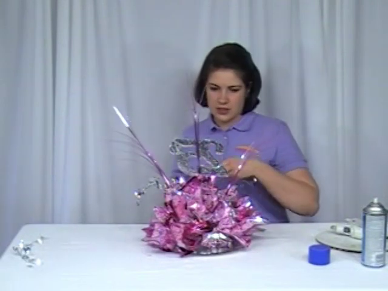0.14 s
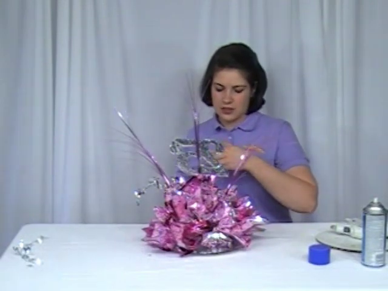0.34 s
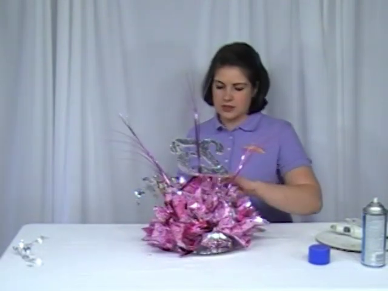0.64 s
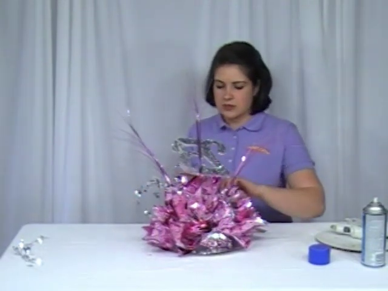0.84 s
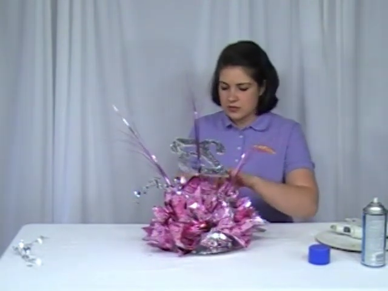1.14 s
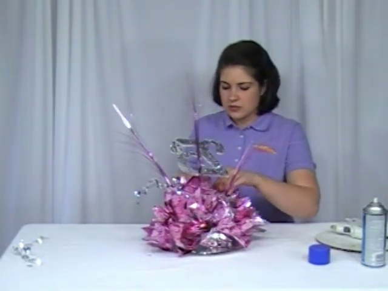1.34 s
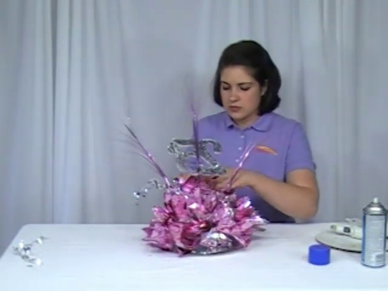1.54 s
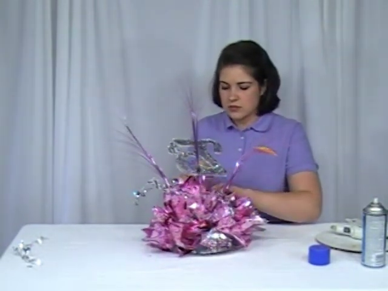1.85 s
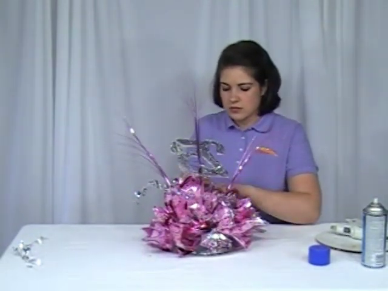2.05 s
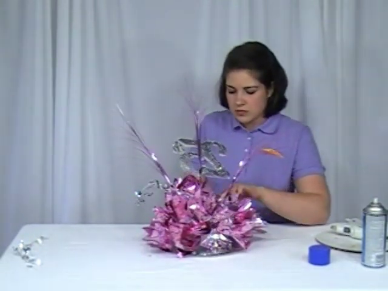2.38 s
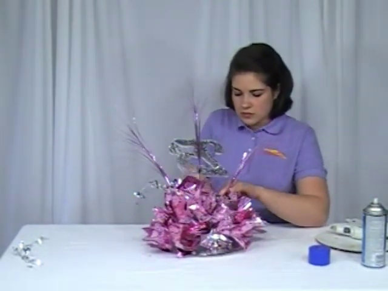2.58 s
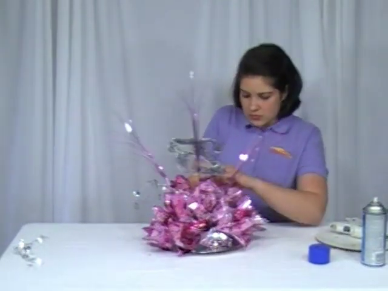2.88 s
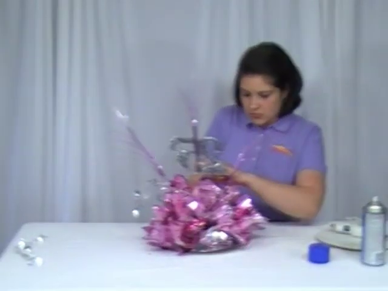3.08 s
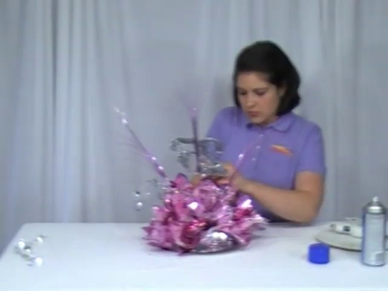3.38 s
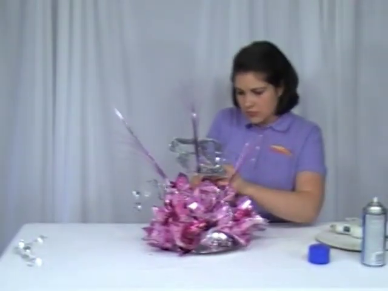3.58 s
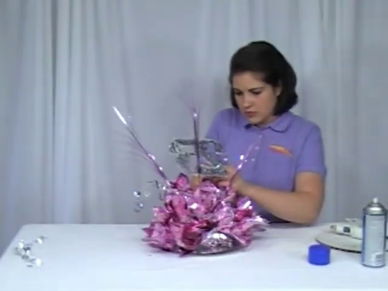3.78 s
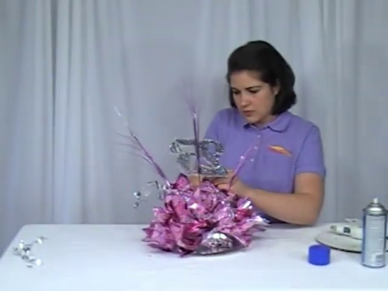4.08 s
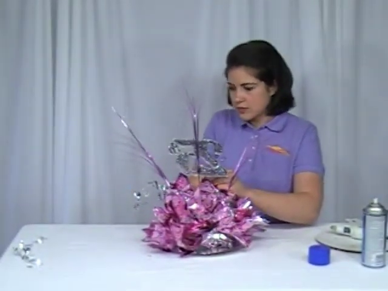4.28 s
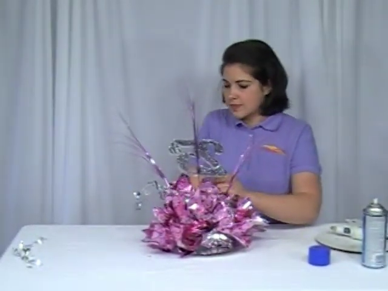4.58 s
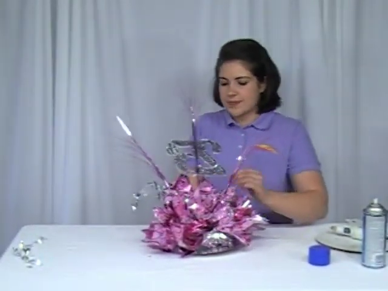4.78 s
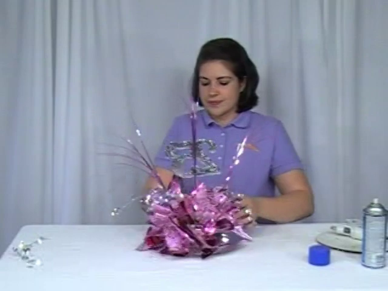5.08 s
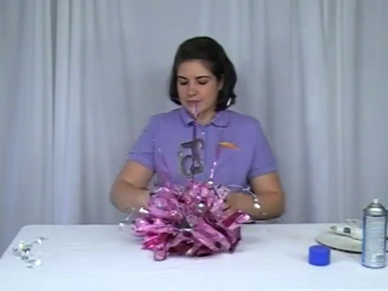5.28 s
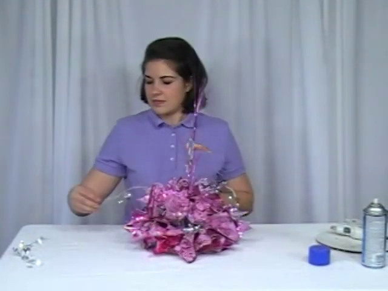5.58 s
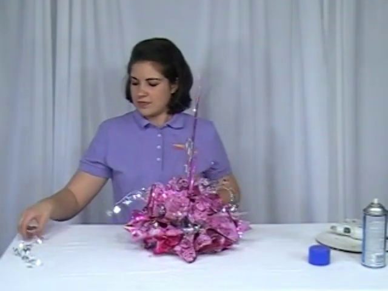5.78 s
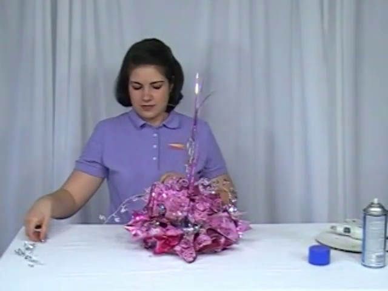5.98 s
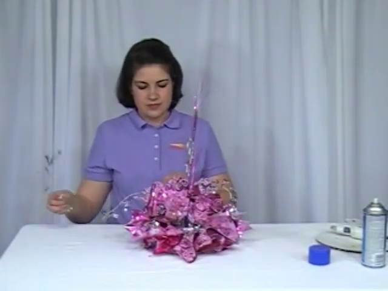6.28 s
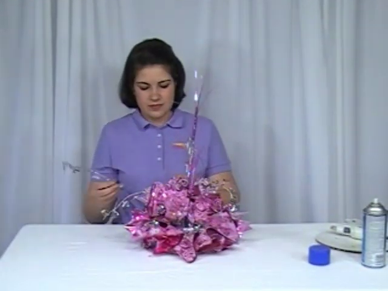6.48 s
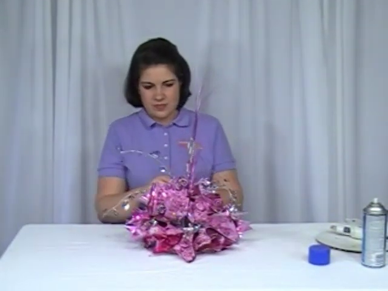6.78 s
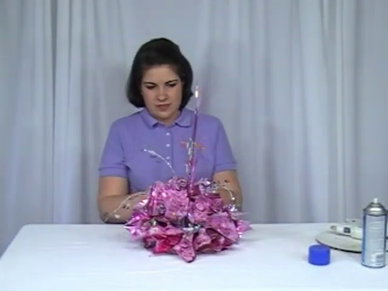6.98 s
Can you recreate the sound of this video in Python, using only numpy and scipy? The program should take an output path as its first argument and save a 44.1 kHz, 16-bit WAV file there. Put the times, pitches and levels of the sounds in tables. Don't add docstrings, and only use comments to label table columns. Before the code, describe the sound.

Crisp foil rustling indoors, picked up from a short distance with a light room tail. Dense tiny clicks swell and stop as fingers grip, joined by loud creases, needle-sharp ticks and small bead or wire taps. A hard snap breaks out before four seconds and a dense crackling cluster around five; a quiet pause and soft table bumps precede the last crinkles. Soft ventilation and electrical buzz never stop.

```python
import sys
import numpy as np
from scipy import signal
from scipy.fft import rfft, irfft, next_fast_len
from scipy.io import wavfile
from scipy.ndimage import map_coordinates

SR = 44100
rng = np.random.default_rng(int(sys.argv[2]) if len(sys.argv) > 2 else 0)


def unload_wav(signal):
    wavfile.write(
        sys.argv[1],
        SR,
        np.round(np.clip(np.atleast_2d(signal).T, -1, 1) * 32767).astype(np.int16),
    )


def gain_from_decibels(decibels):
    exponent = np.asarray(decibels, float) / 20
    return 10 ** exponent


N = 314874

# start_s, crinkle_db, crumple_above_crinkle_db
FIDGETS = [(0, -60.5, -2.5), (.52, -62.5, -1.5), (.8, -45, -5), (1.37, -47, -7.5), (1.69, -49.5, -3.5),
           (1.8, -45, -5), (2.54, -43.5, -4), (2.65, -36.5, -4.5), (2.8, -45, -6), (2.92, -57.5, -3),
           (3.6, -56, 0), (4.3, -63.5, 5), (4.87, -48.5, -1.5), (5.75, -56.5, 3.5), (6.38, -65, -2.5),
           (6.6, -47, -2), (6.92, -37, -6), (7.14, -49, -0.5)]
# start_s, hold_s, crinkle_db, crumple_above_crinkle_db
FINGER_GRIPS = [(0.576, .005, -43.5, -8), (0.691, 0.0094, -38.5, -7), (0.938, 0.02, -41.5, -6),
                (1.09, 0.052, -40, -4), (1.207, 0.085, -45.5, -6.5), (1.45, .06, -44.5, -4.5),
                (1.57, .04, -57, -8), (1.702, 0.031, -39, -9.5), (1.884, 0.028, -36, -5),
                (2.056, 0.021, -35.5, -8.5), (2.217, 0.035, -36.5, -5.5), (2.355, 0.047, -39, -15),
                (2.956, 0.045, -53, 4), (3.064, .02, -43, -3.5), (3.222, 0.12, -47.5, -4.5),
                (3.354, 0.16, -40.5, -5.5), (3.87, 0.021, -40, -2), (4.134, 0.08, -43, -10),
                (4.375, .01, -40.5, -6.5), (4.46, .065, -40, -4), (4.603, .03, -43, -9.5),
                (4.927, .04, -32, -16), (5.032, 0.41, -37, -6.5), (5.494, 0.022, -42.5, -6),
                (5.592, .07, -43, -14), (5.71, .005, -53, 3), (6.445, 0.066, -46, -7.5),
                (6.657, .01, -39.5, -13), (7.135, .01, -42, -1)]
# frequency_hz, level_db
CRINKLE_COLOUR = [(1880, -18.5), (3200, -20.5), (3990, -11.5), (5400, -3), (6620, -1), (7490, 0),
                  (9020, -6), (12300, -17.5), (16000, -62), (22000, -120)]
# frequency_hz, level_db
CRUMPLE_COLOUR = [(180, -50), (300, -30), (369, -10), (521, -14.5), (634, -7), (1740, -1), (1870, 0.5),
                  (4000, -7), (5200, -9), (8800, -120)]
# frequency_hz, decay_60db_s
ROOM_DECAY = [(200, 0.95), (2000, 0.76), (7000, 0.69), (12000, 0.38)]
# frequency_hz, level_db
AIR_MID_COLOUR = [(15, -50), (25, -14.5), (150, -12.5), (220, -8), (445, -4.5), (900, -6), (1150, -8.5),
                  (1400, -10.5), (3280, -18.5), (4500, -15.5), (8000, -22.5), (9500, -25.5), (12400, -22),
                  (16000, -60)]
# frequency_hz, level_db
AIR_SIDE_COLOUR = [(15, -60), (25, -35), (125, -13.5), (189, -10.5), (286, -7.5), (547, -6), (656, -7.5),
                   (1260, -12), (1800, -16), (6950, -30), (12300, -33), (16000, -68), (22000, -120)]
# pitch_hz, level_db
LAMP_TONES = [(241, -70), (720, -70.5), (839.8, -75.5), (961, -76), (1081, -65.5), (2638, -74),
              (3537, -69.5), (3661, -71), (3779, -68), (4980, -70), (5760, -67), (5997, -72), (8096, -76),
              (10557, -73)]
# start_s, peak_db
THIN_CREASES = [(0.146, -43), (0.2, -39.5), (0.5465, -37), (.627, -35), (.678, -29.5), (0.958, -26),
                (1.056, -28.5), (1.4744, -29.5), (1.5562, -26), (1.6295, -29), (1.8028, -27), (2.0504, -28),
                (2.2585, -23), (2.469, -26), (2.9477, -32), (3.0447, -34), (3.2032, -33.5), (3.259, -35.5),
                (3.7594, -34.5), (4.0331, -34), (4.2372, -34), (4.415, -27.5), (4.918, -30), (5.1627, -26),
                (5.3432, -20.5), (6.2207, -36), (6.419, -40), (6.47, -28), (6.9656, -27.5), (7.0653, -27)]
# start_s, peak_db
WIDE_CREASES = [(0.8825, -30.5), (1.3758, -34.5), (1.692, -30), (1.8443, -29), (2.2004, -33), (2.385, -30),
                (2.5541, -28.5), (3.0844, -30.5), (3.3543, -27.5), (3.6593, -34), (3.7196, -36),
                (4.1034, -37), (4.147, -33), (4.181, -37), (4.6057, -26), (4.7571, -48), (5.2882, -24.5),
                (5.868, -39), (6.33, -39), (6.7421, -27)]
# start_s, peak_db, fold_above_peak_db, stem_above_peak_db
BIG_CREASES = [(0.5765, -29, -11.5, -7), (0.7056, -25.5, -28, -1.5), (0.9418, -30, -5, -8),
               (1.0974, -29.5, -7.5, -9), (1.4945, -23, -27, -16), (2.0911, -28.5, -16, 0),
               (2.5986, -26.5, -23, -18), (2.6743, -25, -18, -12), (2.7368, -30.5, -7, 0.5),
               (2.938, -30.5, -30, 0.5), (3.3271, -22.5, -21, -26), (3.8336, -16, -12.5, -7.5),
               (3.876, -23.5, -17, -20), (4.369, -23.5, -14, -2), (4.5058, -17, -13.5, -13.5),
               (4.9416, -23, -9, -9), (4.9594, -20, -8.5, -31), (4.9887, -23, -16, -28),
               (5.0333, -23.5, -12, -3.5), (5.1002, -23.5, -29, -21), (5.4081, -22, -8, -9),
               (5.4287, -20.5, -11.5, -21), (5.5018, -26.5, -9, -5), (5.6192, -29, -14, -5),
               (5.7147, -28, -21, -5.5), (6.0106, -31, -13, -33), (6.5127, -20, -31, -9),
               (6.5231, -22.5, -16, -15), (6.6487, -24, -7.5, -13), (6.784, -26, -9.5, -6)]
# frequency_hz, level_db
STEM_COLOUR = [(1200, -30), (2200, -7.5), (3000, -7), (4500, -15), (6000, -10), (12000, -25)]
# start_s, peak_db, pitch_hz
STIFF_FACETS = [(0.5824, -29, 7730), (0.7104, -30, 7350), (0.7184, -27, 6630), (2.2385, -23, 6870),
                (2.2624, -32, 6770), (2.272, -33, 7290), (2.9477, -32, 7500), (3.2034, -29.5, 8200),
                (3.2194, -42, 6800), (3.327, -35, 7590), (3.834, -18, 8600), (3.844, -20, 7060),
                (4.369, -27, 5400), (4.5063, -18, 8300), (4.8928, -34, 8140), (4.9604, -25, 6740),
                (4.9747, -15, 8100), (4.9897, -16, 7900), (5.001, -18, 8010), (5.009, -26, 7460),
                (5.061, -22, 7550), (5.0992, -19, 6670), (5.664, -28, 6000), (5.7252, -31, 7800),
                (6.0102, -35, 7960), (6.3764, -43, 8500), (6.5157, -27, 6150)]
# start_s, peak_db, pitch_hz, decay_60db_s
DISH_TAPS = [(.584, -39, 3060, .06), (.697, -31, 4780, 0.049), (1.555, -37, 4940, 0.045),
             (2.64, -35, 4500, 0.046), (3.128, -41.5, 1103, 0.06), (3.836, -32, 2620, 0.062),
             (4.369, -37, 2520, 0.049), (6.012, -40.5, 1580, 0.056), (6.02, -50.5, 1810, .2),
             (6.513, -31, 4270, 0.049), (6.521, -48, 4200, .3), (6.65, -37, 1560, 0.065),
             (6.652, -41, 3730, .08)]
# start_s, peak_db, decay_scale_s
TABLE_PUSHES = [
    (3.833, -43.5, 1.6),
    (4.377, -48.5, 1.16),
    (4.503, -48, 0.95),
    (5.827, -39, 1.15),
    (5.96, -48, 0.89),
]
# pitch_hz, pair_spacing_hz, level_db, share_of_decay
TABLE_MODES = [(187, 19, -6.5, 0.37), (252.6, 20.6, -0.5, 0.31), (370, 30, -6.5, 0.48),
               (469, 38, -13, 0.65)]
# frequency_hz, level_db
RUMBLE_COLOUR = [(50, -37), (110, -7), (300, 0), (550, -2), (1200, -30)]
# frequency_hz, level_db
SIDE_RESPONSE = [(200, -3), (600, -12), (1300, -23), (2700, -17.5), (5500, -17.5), (7300, -16), (8400, -4),
                 (9500, -9.5), (12500, -7.5)]
# frequency_hz, level_db
FOIL_RESPONSE = [(20, -40), (130, -9), (260, 0), (400, -0.5)]
# frequency_hz, level_db
KNOCK_BASS = [(20, -36), (70, -9), (150, 0)]

MAINS_HZ = 59.97
RISE_DB_PER_S, FALL_DB_PER_S = 411, 161
THIN_FOLD_DB, THIN_STEM_DB = -18, -11
WIDE_FOLD_DB, WIDE_STEM_DB = -7.5, -23
RING_HZ, RING_SCATTER_HZ = 6900, 850


def unit(x):
    return x / np.sqrt(np.mean(x ** 2) + 1e-20)


def along(points, hz):
    f, v = np.transpose(points)
    return np.interp(np.log(hz + 1), np.log(f + 1), v)


def filtered(x, response):
    m = next_fast_len(N + SR // 2)
    spectrum = rfft(x, m) * response(np.fft.rfftfreq(m, 1 / SR))
    return irfft(spectrum, m)[..., :N]


def coloured(x, colour):
    return filtered(x, lambda hz: gain_from_decibels(along(colour, hz)))


def wobble(rate):
    knots = rng.standard_normal(int(N / SR * 200) + 4)
    return map_coordinates(knots, [np.arange(N) * rate / SR])


def dying_away(s, gain, t60, wave):
    size = wave.shape[1]
    t = np.arange(size)
    rows = gain[:, None] * gain_from_decibels(-60 * t / SR / t60[:, None]) * wave
    at = np.round(s * SR).astype(int)[:, None] + t
    return np.bincount(at.ravel(), rows.ravel(), N + size)[:N]


def bursts(s, gain, t60, size):
    return dying_away(s, gain, t60, rng.standard_normal((len(s), size)))


def pings(s, gain, hz, t60, size):
    wave = np.sin(2 * np.pi * hz[:, None] * np.arange(size) / SR)
    return dying_away(s, gain, t60, wave)


def buckling(low_hz, high_hz, spread_db, clump_db, t60, hiss_db, count):
    draw = rng.random((count, 4))
    s = draw[:, 0] * (N - 1) / SR
    strength = gain_from_decibels(np.minimum(-spread_db * np.log(draw[:, 1]), 3.43 * spread_db))
    decay = t60 * (0.5 + 1.07 * draw[:, 2])
    hz = low_hz + (high_hz - low_hz) * draw[:, 3]
    clicks = pings(s, strength, hz, decay, size=256)
    blur = gain_from_decibels(hiss_db) * rng.standard_normal(N)
    clumps = gain_from_decibels(clump_db * wobble(40) + clump_db * wobble(11))
    return clumps * (unit(clicks) + blur)


def rustle():
    t = np.arange(N) / SR
    s, crinkle_db, crumple_db = np.transpose(FIDGETS)
    effort_db = np.interp(t, s, crinkle_db)
    facet_power = gain_from_decibels(2 * effort_db)
    fold_power = gain_from_decibels(2 * (effort_db + np.interp(t, s, crumple_db)))
    for s, hold, crinkle_db, crumple_db in FINGER_GRIPS:
        near = slice(max(round((s - .2) * SR), 0), round((s + hold + .5) * SR))
        closing_db = np.maximum(RISE_DB_PER_S * (s - t[near]), 0)
        release_db = np.maximum(FALL_DB_PER_S * (t[near] - s - hold), 0)
        power = gain_from_decibels(2 * (crinkle_db - closing_db - release_db))
        facet_power[near] += power
        fold_power[near] += power * gain_from_decibels(2 * crumple_db)
    facets = buckling(low_hz=500, high_hz=13500, spread_db=4.2, clump_db=1.5, t60=.003,
                      hiss_db=-7, count=19500)
    large = buckling(low_hz=260, high_hz=4500, spread_db=1.5, clump_db=1.0, t60=0.0062,
                     hiss_db=-1.0, count=7000)
    folds = 0.5 * unit(facets) + unit(large)
    crinkle = np.sqrt(facet_power) * gain_from_decibels(-4.5) * unit(coloured(facets, CRINKLE_COLOUR))
    crumple = np.sqrt(fold_power) * gain_from_decibels(-3.5) * unit(coloured(folds, CRUMPLE_COLOUR))
    return crinkle + crumple


def room(x):
    stretch, delay = SR // 4, 120
    out = np.zeros((2, N + SR))
    for start in range(0, N, stretch):
        hz, t, z = signal.stft(rng.standard_normal((2, SR // 2)), SR, nperseg=256)
        decay = gain_from_decibels(-60 * t / along(ROOM_DECAY, hz)[:, None])
        tail = signal.istft(z * decay, SR, nperseg=256)[1]
        tail = tail / np.linalg.norm(tail[0])
        wet = signal.fftconvolve(x[None, start:start + stretch], tail, axes=1)
        out[:, start + delay:start + delay + wet.shape[1]] += wet
    return out[:, :N]


def lamp_tone(hz, db):
    t = np.arange(N) / SR
    phase = 2 * np.pi * hz * t + 6 * rng.random() + .15 * wobble(8)
    return gain_from_decibels(db + 1.4 * wobble(4.06)) * np.sin(phase)


def background():
    t = np.arange(N) / SR
    phases = np.exp(2j * np.pi * rng.random(240))

    def scatter(hz):
        return phases[np.minimum(np.round(hz / MAINS_HZ).astype(int), 239)]

    buzz = filtered(np.diff(np.floor(t * MAINS_HZ), prepend=0), scatter)
    air = rng.standard_normal(N) + 0.36 * unit(buzz)
    mid = gain_from_decibels(-60) * unit(coloured(air, AIR_MID_COLOUR))
    side = gain_from_decibels(-54) * unit(coloured(rng.standard_normal(N), AIR_SIDE_COLOUR))
    hum_mid = sum(lamp_tone(hz, db + 2.5 - 1.7 * np.log2(hz / 240)) for hz, db in LAMP_TONES)
    hum_mid = hum_mid + lamp_tone(hz=213.8, db=-71.5)
    hum_side = sum(lamp_tone(hz, db - 4 * np.log2(hz / 300)) for hz, db in LAMP_TONES)
    return np.array([mid + hum_mid, side + hum_side])


def snaps():
    thin = [(*row, THIN_FOLD_DB, THIN_STEM_DB) for row in THIN_CREASES]
    wide = [(*row, WIDE_FOLD_DB, WIDE_STEM_DB) for row in WIDE_CREASES]
    s, db, fold_db, stem_db = np.transpose(list(BIG_CREASES) + thin + wide)
    hz = RING_HZ + RING_SCATTER_HZ * rng.standard_normal(len(s))
    each = np.ones(len(s))
    at = np.round(s * SR).astype(int)
    parts = [(db - .8, .022, CRINKLE_COLOUR),  # level, decay in s, colour
             (db + fold_db + 6.0, .035, CRUMPLE_COLOUR),
             (db + stem_db + 7.0, .03, STEM_COLOUR)]
    direct, spread = np.zeros(N), np.zeros(N)
    for level, t60, colour in parts:
        direct += coloured(bursts(s, gain_from_decibels(level), t60 * each, size=1600), colour)
        energy = t60 * SR / np.log(1e6)
        spread += coloured(np.bincount(at, gain_from_decibels(level), N) * np.sqrt(energy), colour)
    ring = pings(s, gain_from_decibels(db - 38.0), hz, 0.0031 * each, size=300)
    return direct + ring, spread


def sparks():
    s, db, hz = np.transpose(STIFF_FACETS)
    t60 = np.full(len(s), .004)
    click = pings(s, gain_from_decibels(db - 1.0), hz, t60, size=300)
    echo = pings(s + 0.00119, gain_from_decibels(db - 7), 1.2 * hz, t60, size=300)
    return click + echo


def tinks():
    s, db, hz, t60 = np.transpose(DISH_TAPS)
    return sum(pings(s, gain_from_decibels(db - 5.5), hz * ratio, t60, size=5000) for ratio in (.93, 1, 1.09))


def knocks():
    s, db, scale = np.transpose(TABLE_PUSHES)
    rows = []
    for capsule_db in (-5.5, -6.5):
        ring = np.zeros(N)
        for hz, width, mode_db, share in TABLE_MODES:
            for side in (-.5, .5):
                late = s + 0.01212 * rng.random(len(s))
                pitch = hz + width * (side + 0.27 * rng.standard_normal(len(s)))
                ring += pings(late, gain_from_decibels(db + capsule_db + mode_db), pitch, share * scale, size=SR // 2)
        thud = bursts(s, gain_from_decibels(db + capsule_db + 11.5), 0.76 * scale, size=SR // 2)
        rows.append(ring + coloured(thud, RUMBLE_COLOUR))
    return np.array(rows)


def scene():
    bed, taps = rustle(), tinks()
    cracks, spread = snaps()
    near = bed + cracks + taps + sparks()
    wet_mid, wet_side = room(gain_from_decibels(-2.0) * bed + gain_from_decibels(1.0) * spread + gain_from_decibels(-4.5) * taps)
    foil_side = coloured(gain_from_decibels(7) * wet_side + 0.099 * near, SIDE_RESPONSE)
    foil = np.array([near + wet_mid, foil_side])
    mid, side = coloured(foil, FOIL_RESPONSE) + coloured(knocks(), KNOCK_BASS) + background()
    return np.array([mid + side, mid - side]) * gain_from_decibels([[-.4], [.4]])


def band_limit(x):
    return signal.sosfilt(signal.butter(12, 12530, fs=SR, output="sos"), x)


def record(dry):
    return band_limit(dry)


dry = scene()
out = record(dry)
unload_wav(out)
```